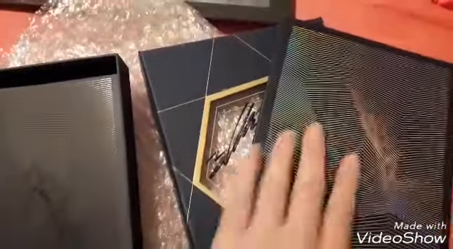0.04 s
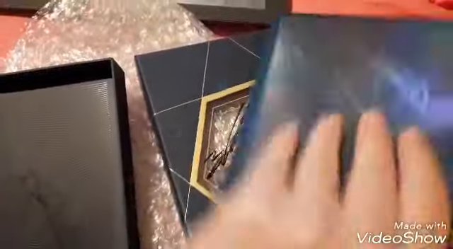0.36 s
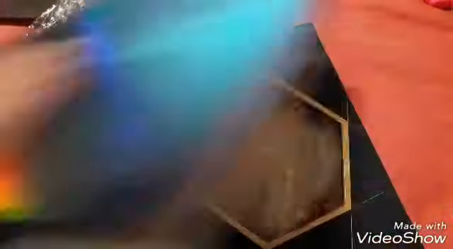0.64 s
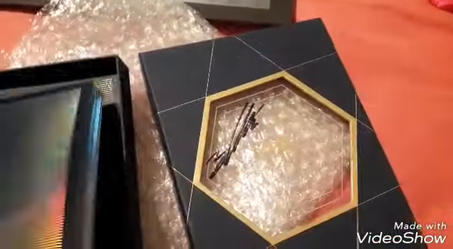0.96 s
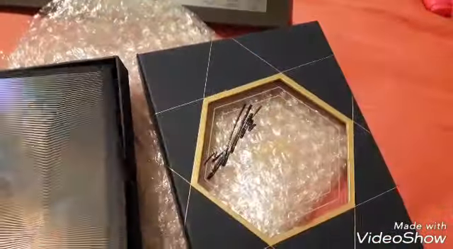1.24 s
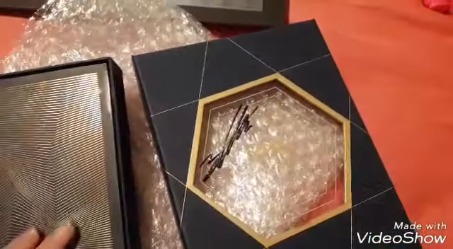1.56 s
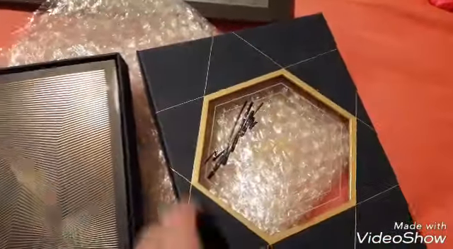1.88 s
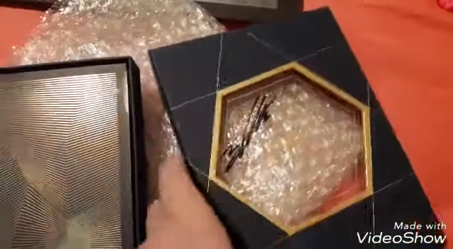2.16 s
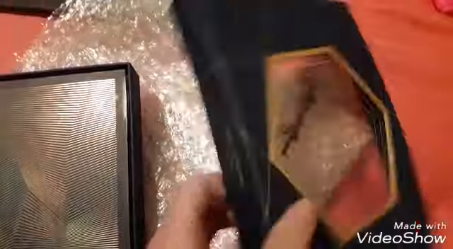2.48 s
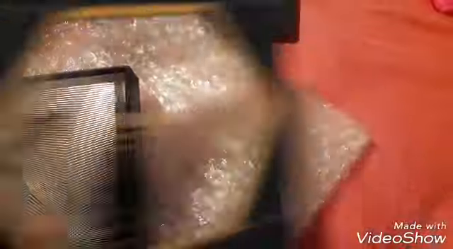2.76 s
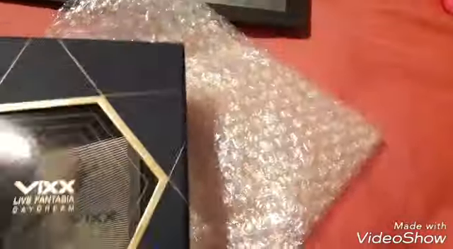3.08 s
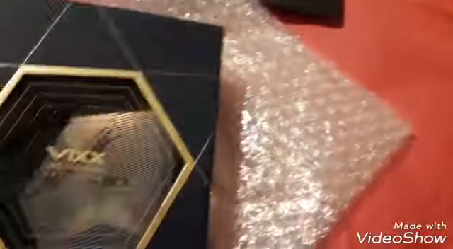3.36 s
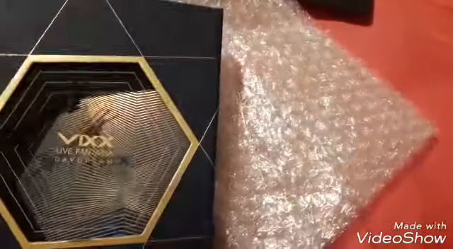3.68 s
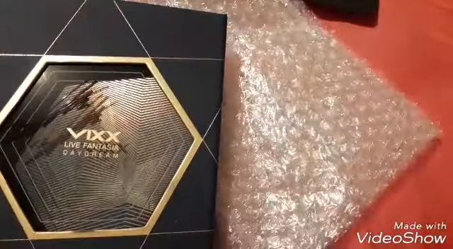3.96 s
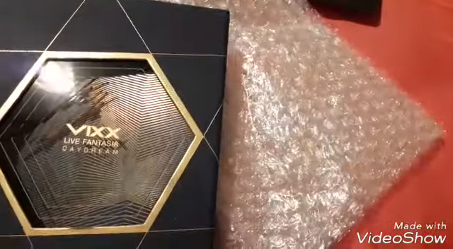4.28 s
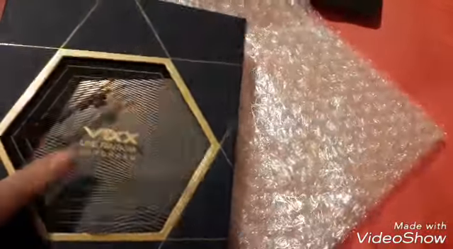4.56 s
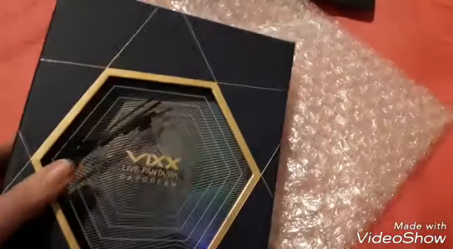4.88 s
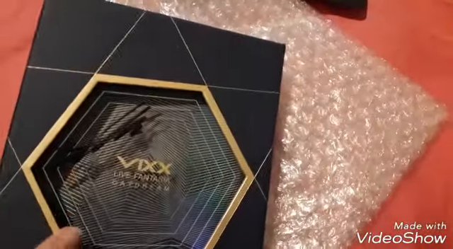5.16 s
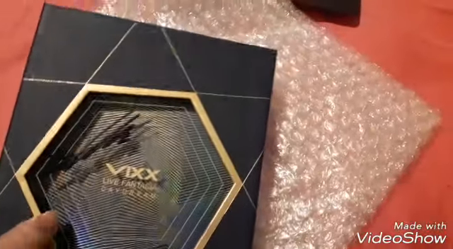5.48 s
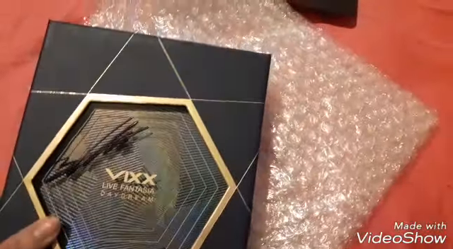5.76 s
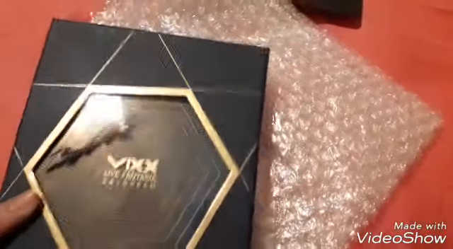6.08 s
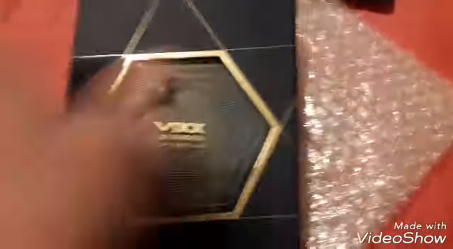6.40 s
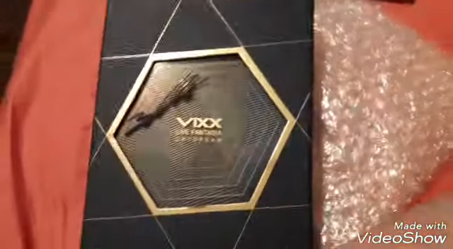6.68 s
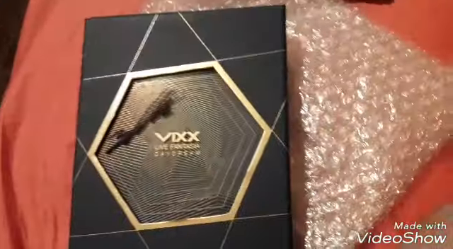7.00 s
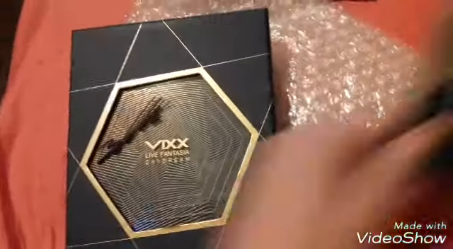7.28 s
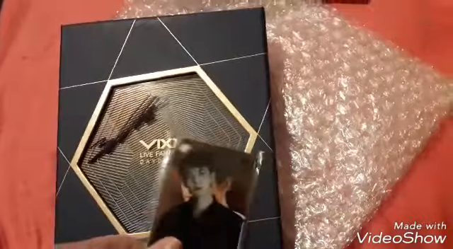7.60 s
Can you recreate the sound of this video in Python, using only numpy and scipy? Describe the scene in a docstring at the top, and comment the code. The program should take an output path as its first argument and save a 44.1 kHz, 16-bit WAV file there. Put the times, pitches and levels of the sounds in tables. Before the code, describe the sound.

Close handling of cardboard boxes: uneven taps and hollow thumps, short rasping slides and faint sleeve swishes over low room noise.

```python
"""Stiff cardboard boxes are tapped, slid and set down on a soft cover in a small quiet room, near a phone.
Each knock thumps a hollow panel, rings the board and cracks at the edge. Sliding faces rasp as fibres
catch and slip; hands rumble dully on the boxes. A sleeve swishes, and a plastic card sleeve ticks once
near the end. Under it all: room noise, a faint whine and thin microphone hiss."""
import sys
import numpy as np
from scipy import signal
from scipy.fft import rfft, irfft, next_fast_len
from scipy.io import wavfile
from scipy.ndimage import map_coordinates

SR = 44100
rng = np.random.default_rng(int(sys.argv[2]) if len(sys.argv) > 2 else 0)


def inscribe(sig):
    """Save sig as 16-bit PCM at rate SR to the path in sys.argv[1].

    A 1-D sig is mono; a 2-D sig holds one channel per row.
    Samples are clipped to [-1, 1] before scaling.
    """
    pcm = np.round(np.clip(np.atleast_2d(sig).T, -1, 1) * 32767)
    wavfile.write(sys.argv[1], SR, pcm.astype(np.int16))


N = 336835

# Noise spectra. Each row: frequency in Hz, relative density in dB.
ROOM_NOISE = [(15, -52), (25, -20), (43, -17.5), (76, -6.5), (323, -8.5), (356, -11.5), (392, -7.5),
              (536, -8), (733, -13), (1110, -14), (1190, -15.5), (1670, -19), (2830, -21.5), (8000, -40),
              (10400, -66), (17600, -120)]
HISS_MID = [(100, -14), (3000, -9), (6000, -10), (7800, -14), (9500, -6), (11500, -.5), (14000, 0),
            (15700, -3), (16500, -60)]
HISS_SIDE = [(20, -7), (130, 0), (430, 0), (1400, -4), (3200, -5.5), (6000, -11.5), (7900, -17),
             (10000, -13), (12000, -9.5), (14000, -9.5), (15700, -12.5)]
# Room decay. Each row: frequency in Hz, T60 in seconds.
ROOM_T60 = [(100, 0.28), (500, 0.2), (2000, 0.3), (5000, 0.36), (12000, 0.14)]

# Spectra of rubbing surfaces. Each row: frequency in Hz, relative density in dB.
CLOTH = [(180, -8), (430, -2.5), (620, -12), (850, -4), (1500, -2.5), (2500, -7.5), (3600, -12),
         (5500, -25), (8000, -44), (12000, -23), (16000, -37)]
FINGERS = [(200, -32), (450, -1), (700, -14), (1000, 5), (1250, -5), (1700, -11), (3000, -19), (6000, -33),
           (9000, -56)]
EDGE = [(80, -13), (250, -18), (450, -4), (600, -12), (800, -1.5), (1050, -4.5), (1500, -16.5),
        (2200, -13.5), (2700, -14), (3900, -14.5), (5200, -34), (7500, -66), (12000, -42), (16000, -51)]
GLOSS = [(180, -6.5), (430, -5), (650, -21), (1000, -2), (1700, -6.5), (2300, -3), (3000, -2.5),
         (3900, -14), (5500, -28), (8000, -41), (16000, -28)]
WALL = [(80, -9), (200, -14), (330, -1.5), (650, -0.5), (980, 2.5), (1400, -10.5), (2500, -10.5),
        (3700, -19.5), (5500, -33.5), (7800, -55), (12000, -39), (16000, -42)]
GRIP = [(150, -5.5), (300, -3.5), (620, -8), (980, 0), (1200, -8), (1580, -5.5), (1950, -14), (3000, -16),
        (5000, -28), (8000, -49), (12000, -32), (16000, -36)]
SETTLE = [(120, -28), (200, -10.5), (388, -1), (598, -8.5), (688, -6), (766, -9.5), (1400, -7),
          (1790, -12.5), (1930, -13), (3170, -17), (8000, -49.5), (10400, -89), (17600, -120)]
DRAG = [(90, -16), (170, -7), (280, -4), (400, 2.5), (500, 5), (630, -11.5), (850, -11), (1500, -6),
        (2000, -16.5), (3800, -25), (5200, -37), (8000, -58), (12000, -38.5), (16000, -47)]
# Sleeve and hand moves. Each row: start in seconds, relative peak in dB, rise and fall in seconds.
SLEEVE_SWISHES = [(2.59, -62, 0.037, 0.27), (3.15, -65, 0.067, 0.4), (4.62, -62, 0.17, 0.28),
                  (6.05, -57, 0.01, 0.14), (6.24, -57.5, 0.092, 0.19), (6.5, -57, 0.35, 0.22),
                  (7.12, -65, 0.21, 0.17)]
HAND_SHIFTS = [(.34, -64, 0.036, .2), (1.95, -50.5, .17, 0.2), (2.1, -43, 0.043, 0.048),
               (2.6, -52.5, 0.083, 0.14), (2.84, -61.5, 0.063, .2), (6.3, -56, .16, 0.041),
               (6.85, -52.5, 0.43, .4)]
# Slides. Each row: start in seconds, relative peak in dB, rise and fall in seconds, surface spectrum.
LID_STROKES = [(.1, -58, 0.16, 0.091, FINGERS), (.322, -39, 0.035, 0.022, EDGE),
               (.325, -52, 0.029, 0.049, GLOSS), (.558, -63, 0.022, .06, GLOSS),
               (.963, -52.5, 0.031, 0.093, GLOSS), (1.06, -51, .055, .12, GLOSS),
               (1.14, -61, 0.082, 0.19, GLOSS), (1.37, -40.5, 0.11, 0.067, WALL),
               (1.41, -54, .08, 0.068, GLOSS), (1.615, -44, 0.024, 0.06, EDGE),
               (1.7, -56, 0.031, 0.054, WALL)]
BOX_STROKES = [(1.94, -46.5, 0.018, 0.15, GRIP), (2.07, -48.5, 0.12, 0.25, GRIP),
               (2.39, -55, 0.048, 0.17, GRIP), (3.412, -48.5, 0.0098, 0.064, SETTLE),
               (3.49, -52, 0.09, 0.15, SETTLE), (3.67, -48, 0.035, 0.058, SETTLE),
               (3.76, -54, 0.069, 0.18, SETTLE), (5.3, -54.5, 0.071, 0.13, DRAG),
               (5.5, -51, 0.039, 0.079, DRAG), (5.49, -46.5, 0.17, 0.32, DRAG),
               (5.8, -46.5, 0.03, 0.022, DRAG)]
# Hollow box resonances. Each row: centre in Hz, width in Hz, relative level in dB.
HOLLOW_MODES = [(96, 40, -1), (158.6, 42, 0.5), (279.3, 56, 0.5)]

# Burst spectra of plastic sleeve and cardboard edge. Each row: frequency in Hz, relative density in dB.
PLASTIC_TICK = [(300, -23), (750, -18), (1050, 15), (1600, -17), (3000, 2), (4500, -6), (6300, -14),
                (8000, -25), (15000, -26)]
EDGE_CRACK = [(600, -43), (1500, -2.5), (2600, 9.5), (3800, -4), (5500, -32), (8000, -37), (16000, -55)]
# Edge catches. Each row: time in seconds, relative peak in dB.
EDGE_CLICKS = [(0.5563, -46.5), (0.9613, -32), (1.637, -32), (1.9495, -39.5), (2.4427, -44.5),
               (2.7029, -60)]
# Panel modes. Each row: ratio to the panel pitch, relative level in dB.
PANEL_MODES = [(.36, -11), (.74, -2), (1, 2), (1.3, -4.5)]
# Stiff board modes. Each row: nominal frequency in Hz, relative level in dB, T60 in seconds.
BOARD_MODES = [(848, -1.5, 0.014), (1039, 4, 0.017), (1297, -6.5, 0.034), (1510, 3, 0.0093),
               (1982, -8.5, 0.017)]
# Knocks. Each row: time in seconds, panel pitch in Hz, relative level in dB, hardness in dB.
KNOCKS = [(0.0628, 300, -52, 9), (0.108, 313, -55.5, 17), (0.205, 248, -57, 11.5), (0.7245, 197, -53, -4),
          (0.9603, 283, -39.5, 2), (0.979, 417, -46, 14), (1.0254, 155, -49, -9), (1.2247, 420, -39, 0.5),
          (1.3657, 600, -34.5, 4.5), (1.637, 402, -33.5, 4.5), (1.929, 235, -43, -10),
          (1.9488, 194, -30, -7.5), (2.043, 280, -42.5, 6.5), (2.1124, 255, -35.5, -5),
          (2.135, 190, -28.5, -6), (2.4429, 358, -42, -2), (2.7026, 390, -47.5, 4), (3.1514, 380, -32, 0),
          (3.158, 161, -42, -10), (3.4188, 996, -38, -0.5), (3.702, 590, -19.5, -17), (3.8966, 470, -40, 0),
          (3.915, 416, -14, -14), (4.005, 390, -37.5, -2), (4.377, 270, -49.5, -6), (4.712, 368, -49, 4),
          (5.389, 343, -35, -11), (5.7827, 340, -34.5, -11), (5.8989, 431, -33, -8),
          (5.928, 432, -18.5, -7.5), (6.0589, 370, -37.5, -2), (6.8855, 207, -49, -4)]


def amp(db):
    """Decibels to gain."""
    return 10 ** (np.asarray(db) / 20)


def unit_rms(x):
    """Scale to rms 1."""
    return x / np.sqrt(np.mean(x ** 2) + 1e-20)


def unit_peak(x):
    """Scale to peak 1."""
    return x / np.abs(x).max()


def along(points, hz):
    """Read (Hz, value) points on a log frequency axis."""
    points_hz, values = np.transpose(points)
    return np.interp(np.log(hz + 1), np.log(points_hz + 1), values)


def wobble(rate_hz):
    """Smooth random curve with knots at rate_hz."""
    knots = rng.standard_normal(int(N * rate_hz / SR) + 4)
    return map_coordinates(knots, [np.arange(N) * rate_hz / SR])


def filtered(x, response):
    """Apply a gain given as a function of Hz."""
    n = x.shape[-1]
    size = next_fast_len(n + SR // 10)
    return irfft(rfft(x, size) * response(np.fft.rfftfreq(size, 1 / SR)), size)[..., :n]


def coloured(x, spectrum):
    """Shape x by a (Hz, dB) spectrum, at rms 1."""
    return unit_rms(filtered(x, lambda hz: amp(along(spectrum, hz))))


def add(track, start_s, sound):
    """Mix a sound in at start_s."""
    part = track[max(round(start_s * SR), 0):][:len(sound)]
    part += sound[:len(part)]


def room_noise(level_db=-64, drift_db=1.5, whine_hz=723, whine_db=-73):
    """Gently drifting room noise with a faint wavering whine."""
    air = amp(level_db + drift_db * wobble(rate_hz=5.48)) * coloured(rng.standard_normal(N), ROOM_NOISE)
    whine_gain = amp(whine_db) * wobble(rate_hz=30)
    whine_phase = 2 * np.pi * whine_hz * np.arange(N) / SR + wobble(rate_hz=25)
    return air + whine_gain * np.sin(whine_phase)


def microphone_hiss(mid_db=-78, side_db=-75.2):
    """Stereo self-noise: one part common to both channels, one opposed."""
    mid = amp(mid_db) * coloured(rng.standard_normal(N), HISS_MID)
    side = amp(side_db) * coloured(rng.standard_normal(N), HISS_SIDE)
    return mid + np.array([side, -side])


def room_reverb(x, delay_s=0.005):
    """Short mono tail of a small furnished room."""
    hz, t, spectra = signal.stft(rng.standard_normal(SR // 2), SR, nperseg=256)
    decay = amp(-60 * t / along(ROOM_T60, hz)[:, None])
    tail = signal.istft(spectra * decay, SR, nperseg=256)[1]
    impulse_response = np.pad(tail / np.linalg.norm(tail), (round(delay_s * SR), 0))
    return signal.fftconvolve(x, impulse_response)[:N]


def stroke(start_s, peak_db, rise_s, fall_s, depth_db=21.5, roundness=1.44):
    """Gain of one hand move: it speeds up, peaks and slows, losing depth_db over fall_s."""
    since_peak_s = np.arange(N) / SR - start_s - rise_s
    distance = np.abs(since_peak_s) / np.where(since_peak_s < 0, rise_s, fall_s)
    return amp(peak_db - np.minimum(depth_db * distance ** roundness, 120))


def friction(slip_rate_hz, spread_db, rush_gain):
    """Fibres catch and let go: tiny uneven slips over a smooth rush."""
    slipping = rng.random(N) < slip_rate_hz / SR
    slips = slipping * rng.standard_normal(N) * amp(spread_db * rng.standard_normal(N))
    return unit_rms(unit_rms(slips) + rush_gain * rng.standard_normal(N))


def sleeve_swishes(trim_db=-1):
    """Moving cloth: swells of smooth noise."""
    envelope = amp(trim_db) * sum(stroke(*row) for row in SLEEVE_SWISHES)
    return envelope * coloured(rng.standard_normal(N), CLOTH)


def plastic_tick(start_s=7.334, peak_db=-46, t60_s=0.028):
    """A thin plastic card sleeve ticks as it is picked up."""
    out, t = np.zeros(N), np.arange(SR // 10) / SR
    burst = rng.standard_normal(len(t)) * amp(-60 * t / t60_s)
    add(out, start_s, amp(peak_db) * unit_peak(coloured(burst, PLASTIC_TICK)))
    return out


def hand_rumble(trim_db=-1, holding_db=-74):
    """Slipping skin stirs the hollow box's low resonances, faintly even while it is only held."""
    def response(hz):
        hollow = sum((-1) ** k * amp(db) * 1j * hz * width_hz
                     / (centre_hz ** 2 - hz ** 2 + 1j * hz * width_hz)
                     for k, (centre_hz, width_hz, db) in enumerate(HOLLOW_MODES))
        return hollow * amp(along([(30, -18), (90, 0), (350, -7), (800, -3.5), (3000, -37)], hz))

    rumble = filtered(friction(slip_rate_hz=250, spread_db=2.5, rush_gain=0.8), response)
    envelope = amp(trim_db) * sum(stroke(*row) for row in HAND_SHIFTS) + amp(holding_db)
    return envelope * unit_rms(rumble)


def rub(strokes, grain):
    """Each stroke shapes the friction by the spectrum of its surfaces."""
    return sum(stroke(*move) * coloured(grain, surfaces) for *move, surfaces in strokes)


def box_slides(trim_db=-1, judder_db=2.5):
    """The glossy lid scrapes, the big box drags and settles; both judder with uneven pressure."""
    lid = rub(LID_STROKES, friction(slip_rate_hz=3000, spread_db=4, rush_gain=1))
    box = rub(BOX_STROKES, friction(slip_rate_hz=2200, spread_db=2, rush_gain=0.99))
    pressure = amp(judder_db * wobble(rate_hz=68))
    return amp(trim_db) * pressure * (lid + box)


def strike_envelope(t, t60_s, attack_s=0.0004):
    """Fast rise, exponential decay."""
    return amp(-60 * t / t60_s) * (1 - np.exp(-t / attack_s))


def mode(t, hz, t60_s):
    """One struck, damped mode."""
    return np.sin(2 * np.pi * hz * t) * strike_envelope(t, t60_s)


def edge_crack(t, t60_s=0.019):
    """A stiff edge makes contact: a short noise burst."""
    return unit_peak(coloured(rng.standard_normal(len(t)) * strike_envelope(t, t60_s), EDGE_CRACK))


def board_ring(t, spread_db=2, detune=0.06):
    """The stiff board rings; each spot struck favours other modes."""
    draws = rng.standard_normal((len(BOARD_MODES), 2))
    ring = sum((-1) ** k * amp(db + spread_db * level_draw) * mode(t, hz * (1 + detune * hz_draw), t60_s)
               for k, ((hz, db, t60_s), (level_draw, hz_draw)) in enumerate(zip(BOARD_MODES, draws)))
    return unit_peak(ring)


def panel_thump(t, panel_hz, t60_s=0.012):
    """Neighbouring panel modes start in opposite senses, so the thump builds over its first cycle."""
    return unit_peak(sum((-1) ** (k + 1) * amp(db) * mode(t, ratio * panel_hz, t60_s)
                         for k, (ratio, db) in enumerate(PANEL_MODES)))


def box_knocks(thump_trim_db=1, ring_trim_db=-1, crack_trim_db=-16, crack_slope=0.86):
    """Contacts thump the panel; harder ones ring and crack more. Catching edges click."""
    out, t = np.zeros(N), np.arange(SR // 5) / SR
    for start_s, panel_hz, level_db, hardness_db in KNOCKS:
        thump = amp(thump_trim_db) * panel_thump(t, panel_hz)
        ring = amp(hardness_db + ring_trim_db) * board_ring(t)
        crack = amp(crack_slope * hardness_db + crack_trim_db) * edge_crack(t)
        add(out, start_s, amp(level_db) * (thump + ring + crack))
    for start_s, level_db in EDGE_CLICKS:
        add(out, start_s, amp(level_db) * edge_crack(t))
    # Lift at 6 kHz; soft card passes little of the top treble.
    return filtered(out, lambda hz: amp(along([(3500, -0.5), (6000, 12.5), (9000, -19.5)], hz)))


def scene(reverb_db=-7, bass_cut_hz=82):
    """Close, centred handling over the background; the handling's deep bass is cut away."""
    direct = box_knocks() + plastic_tick() + box_slides() + sleeve_swishes() + hand_rumble()
    handling = direct + amp(reverb_db) * room_reverb(direct)
    bass_cut = signal.butter(4, bass_cut_hz, "high", fs=SR, output="sos")
    return signal.sosfilt(bass_cut, handling) + room_noise() + microphone_hiss()


def record(dry, top_hz=15750):
    """The phone keeps nothing above its band limit."""
    return filtered(dry, lambda hz: hz < top_hz)


dry = scene()
out = record(dry)
inscribe(out)
```